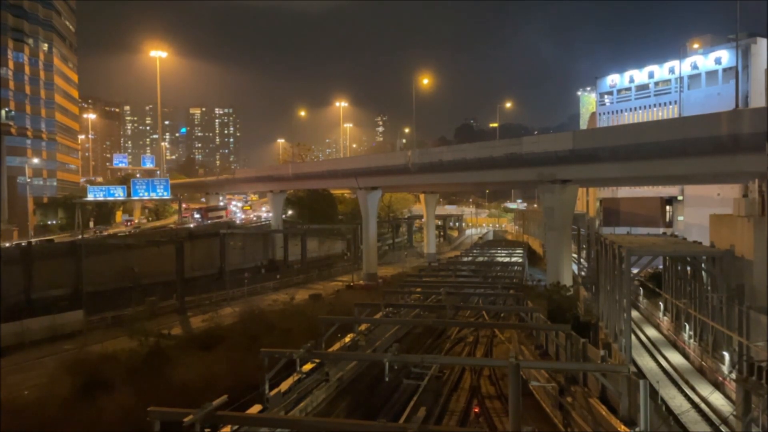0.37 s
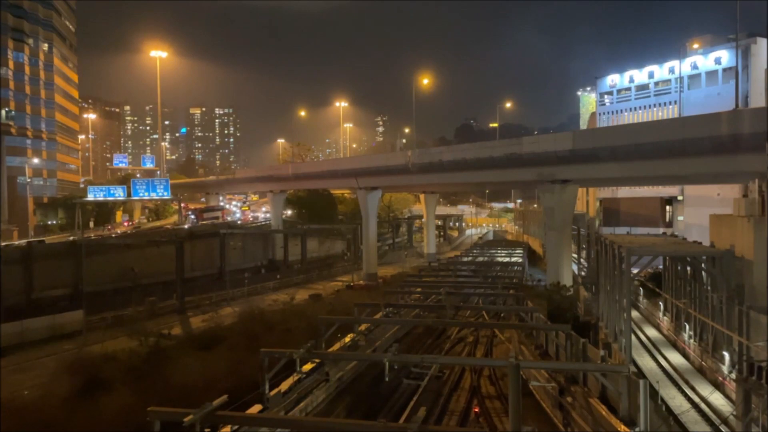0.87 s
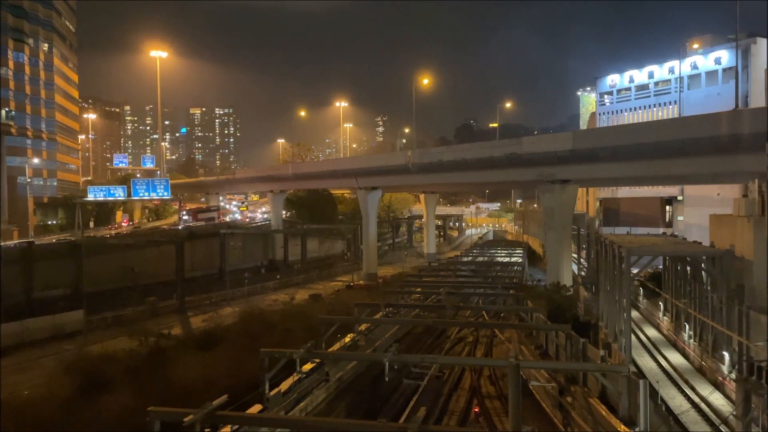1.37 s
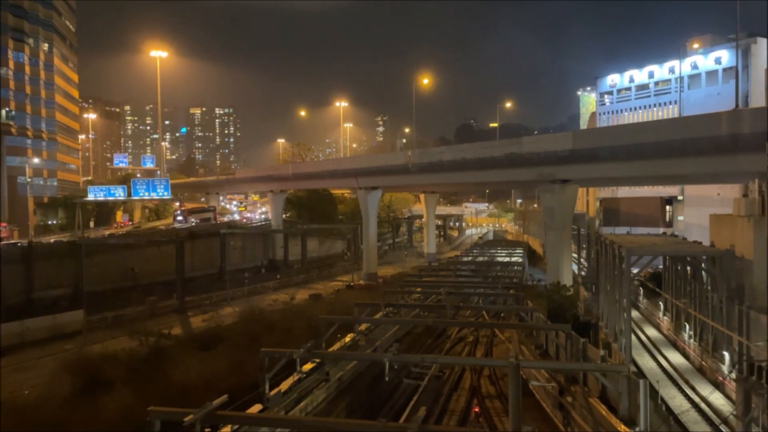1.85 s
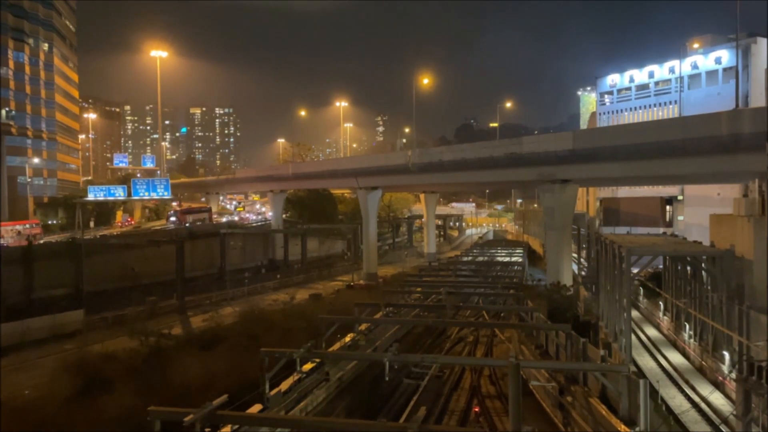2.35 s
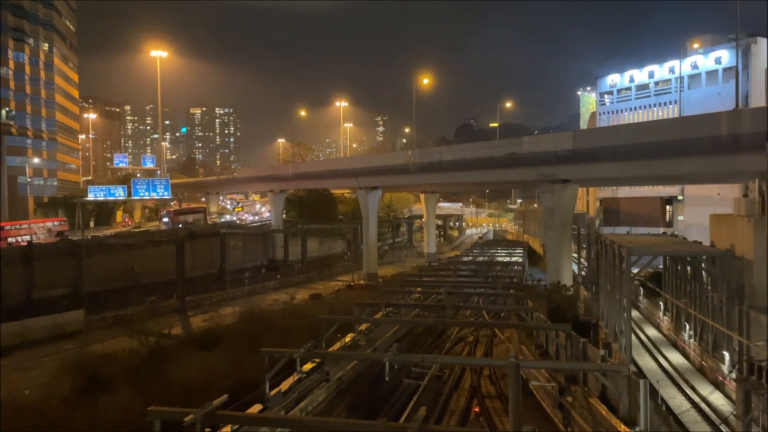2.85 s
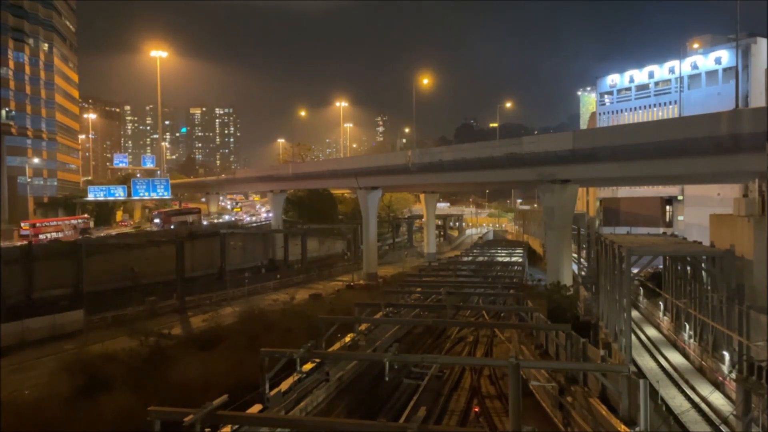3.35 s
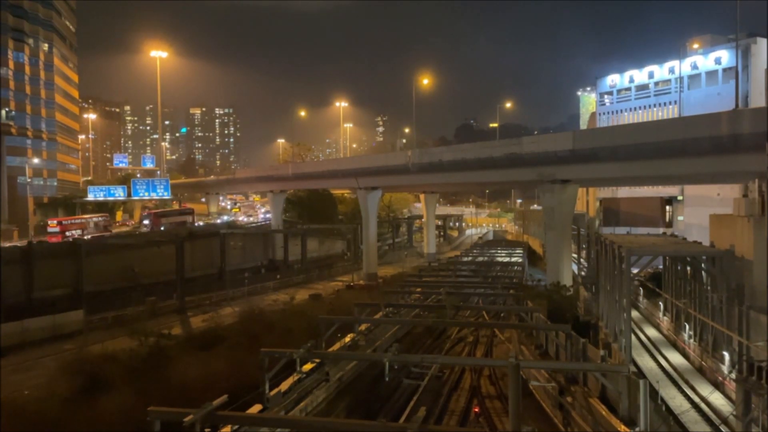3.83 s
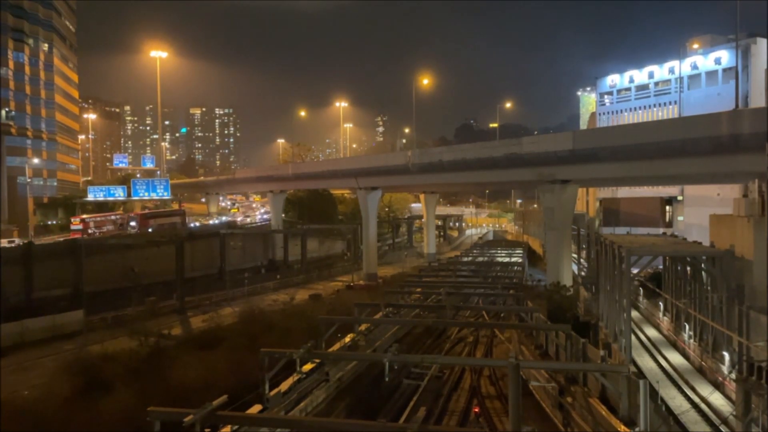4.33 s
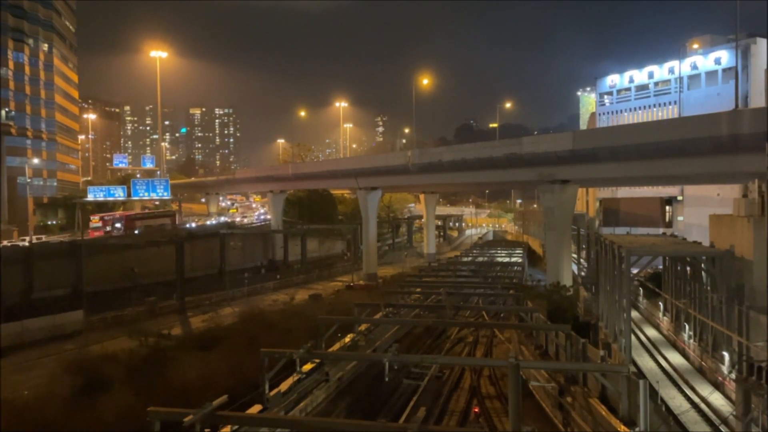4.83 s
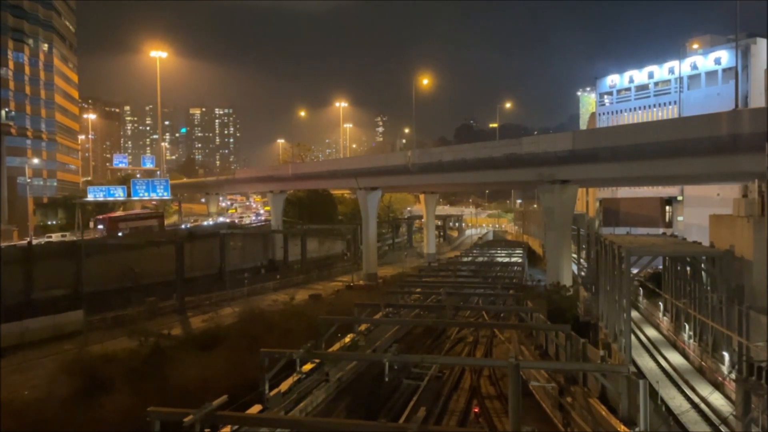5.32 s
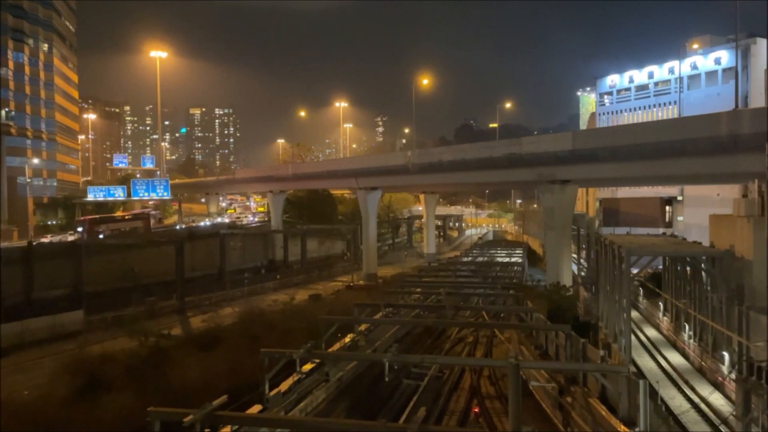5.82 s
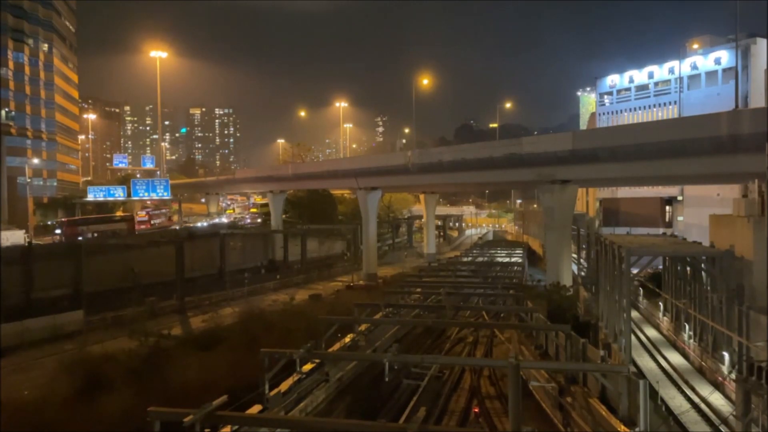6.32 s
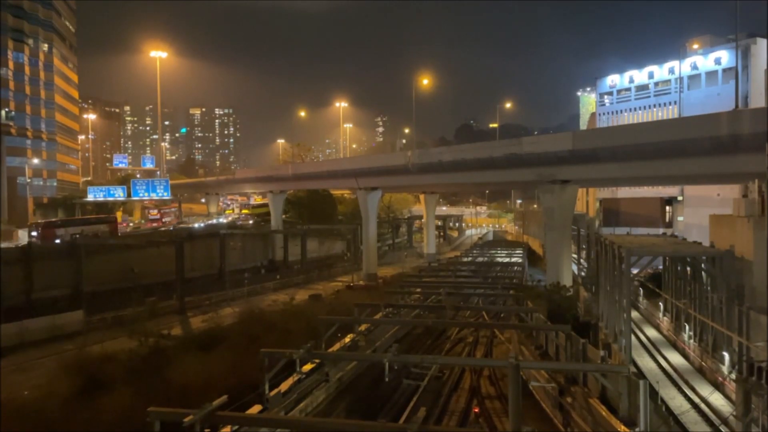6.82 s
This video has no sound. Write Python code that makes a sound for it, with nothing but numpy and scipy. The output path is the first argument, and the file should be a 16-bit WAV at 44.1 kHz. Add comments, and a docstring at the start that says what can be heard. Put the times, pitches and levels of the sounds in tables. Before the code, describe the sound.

Outdoors at night above busy roads, a continuous wash of far traffic in wide stereo. A heavy vehicle's deep engine drone and tyre hiss swell as it moves from right to left, nearest around three seconds, while another car's tyre roar passes the other way. Low gusts buffet the microphones. The drone recedes, two soft knocks tick near five seconds, and a very faint thin brake squeal comes near the end.

```python
"""Night road from above

Traffic in a cutting, heard through two spaced microphones over a far wash of coloured noise.
A heavy vehicle crosses from right to left: a drone of cosine orders, and tyre noise that is briefly shaded.
A second vehicle, tyre noise alone, roars past the other way; both follow the spreading loss of a straight drive.
Low noise gusts buffet the microphones; thin wavering tones make faint brake squeals and a swelling hum;
short ringing modes knock as tyres meet a joint. Near surfaces echo all the noise of the traffic."""
import sys
import numpy as np
from scipy import signal
from scipy.fft import rfft, irfft, next_fast_len
from scipy.io import wavfile
from scipy.ndimage import map_coordinates

SR = 44100
rng = np.random.default_rng(int(sys.argv[2]) if len(sys.argv) > 2 else 0)


def convert_level_to_amplitude(level_db):
    """Map a level in decibels to its linear amplitude factor."""
    exponent = np.asarray(level_db, float) / 20
    return 10 ** exponent


def wrap_up_sound(samples):
    """Save the sound to the file named by the first command line argument, as 16-bit audio."""
    columns = np.atleast_2d(samples).T
    # keep every value between -1 and 1, then stretch to whole-number steps
    tamed = np.clip(columns, -1, 1)
    steps = np.round(tamed * 32767).astype(np.int16)
    wavfile.write(sys.argv[1], SR, steps)


N = 316638
TIME = np.arange(N) / SR
SIZE = next_fast_len(N)
HZ = np.maximum(np.arange(SIZE // 2 + 1) * SR / SIZE, 1)   # 1 Hz floor, for the logarithm


def rms_one(x):
    """Scale to rms 1."""
    return x / np.sqrt(np.mean(x ** 2) + 1e-20)


def in_time(rows):
    """Columns of a curve, sample by sample."""
    times, *columns = np.transpose(rows)
    return [np.interp(TIME, times, column) for column in columns]


def at_hz(points):
    """A curve over log frequency, read at every bin."""
    hz, value = np.transpose(points)
    return np.interp(np.log(HZ), np.log(hz), value)


def filtered(x, gain):
    """Multiply the spectrum by a gain."""
    return irfft(rfft(x, SIZE) * gain, SIZE)[..., :N]


def coloured(spectrum, x):
    """Shape a sound by a spectrum, silent beyond its ends; rms 1."""
    inside = (HZ >= spectrum[0][0]) & (HZ <= spectrum[-1][0])
    return rms_one(filtered(x, convert_level_to_amplitude(at_hz(spectrum)) * inside))


def drift(rate):
    """Slow random wander of rms 1: noise through two equal low-pass poles at rate [Hz]."""
    step = 40   # samples between computed points
    pole = np.exp(-2 * np.pi * rate * step / SR)
    noise = rng.standard_normal(N // step + 2002)
    slow = signal.lfilter([1], [1, -2 * pole, pole * pole], noise)[2000:]   # settled part
    return np.interp(np.arange(N) / step, np.arange(len(slow)), rms_one(slow))


def placed(x, lag, pan_db, order=1):
    """One source reaches two microphones apart in time (left lags, samples) and level (left over right)."""
    way = np.array([[1], [-1]])
    delayed = map_coordinates(x, [np.arange(N) - way * lag / 2], order=order, mode="mirror")
    return delayed * convert_level_to_amplitude(way * pan_db / 2)


# the two straight passes: (nearest at [s], time to drive its own nearest distance [s])
HEAVY_PASS = (3.2, 0.87)
SECOND_PASS = (3.55, 0.99)


def passing(nearest_s, reach_s):
    """A straight drive past: spreading loss in dB and how far ahead it is (1 to -1)."""
    along = (nearest_s - TIME) / reach_s
    return -10 * np.log10(1 + along ** 2), along / np.sqrt(1 + along ** 2)


# the heavy vehicle swings across, also for its tyres and the narrow band: (time [s], left lag [samples])
HEAVY_BEARING = [(0, 14), (.8, 13), (2.75, 3.5), (3.4, -6), (3.95, -11.5), (4.5, -13.5), (7.18, -15)]
DETOUR = 1.42   # low sound bends round the body between the microphones and lags this many times more
# exhaust orders: (time [s], firing rate [Hz], first order level [dB], second order level [dB])
EXHAUST_ORDERS = [(0.0, 49.6, -54, -33), (0.25, 47.64, -47, -23), (0.45, 47.2, -31, -38.5),
                  (0.82, 47.46, -35, -53), (0.96, 47.98, -31, -23), (1.2, 48.24, -48, -23),
                  (1.33, 47.63, -39, -32), (1.46, 48.4, -34, -23), (1.62, 50.16, -24, -22.5),
                  (1.72, 49, -29, -28.5), (1.82, 49.28, -19.5, -23), (2.3, 50.04, -16.5, -20.5),
                  (2.64, 50.1, -14.5, -21.5), (2.9, 51.0, -14.5, -19), (3.2, 50.83, -19, -22),
                  (3.5, 51.3, -19, -20), (3.68, 51.5, -20.5, -28.5), (3.85, 51.3, -19.5, -41),
                  (4.1, 50.9, -24, -33), (4.4, 49.34, -24.5, -60), (4.74, 47.5, -29, -39),
                  (4.95, 47.8, -32, -36), (5.3, 47.25, -26.5, -32.5), (5.55, 48.33, -26.5, -35.5),
                  (5.8, 49, -28.5, -25), (5.92, 47.54, -40, -47), (6.12, 48, -33, -51),
                  (6.27, 48, -35.5, -38), (6.8, 47.5, -34, -32.5), (6.95, 48, -34.5, -35),
                  (7.08, 48.27, -46, -29), (7.18, 49, -49, -35)]
# as it draws level the second order slips ahead of the first: (begins [s], ends [s])
SLIP_SPAN = [2.3, 2.75]


def exhaust():
    """Clean low orders of the firing rate, at first peaking together, wavering more when far."""
    hz, first_db, second_db = in_time(EXHAUST_ORDERS)
    loss_db, _ = passing(*HEAVY_PASS)
    waver_db = 0.4 - 0.2 * loss_db
    turn = 2 * np.pi * np.cumsum(hz * (1 + 0.0053 * drift(8.7))) / SR
    slip = 2 * np.pi * np.interp(TIME, SLIP_SPAN, [0, 0.2])   # up to 0.2 turns
    first = convert_level_to_amplitude(first_db + waver_db * drift(5.5)) * np.cos(turn)
    second = convert_level_to_amplitude(second_db + waver_db * drift(13.0)) * np.cos(2 * turn + slip)
    third = convert_level_to_amplitude(first_db - 24.5 + 3.0 * drift(2.5)) * np.cos(3 * turn)
    lag = DETOUR * in_time(HEAVY_BEARING)[0]
    return placed(np.sqrt(2) * (first + second + third), lag, pan_db=-0.7)


# tyre noise bands, from low roar to finest hiss: (frequency [Hz], relative density [dB])
LOW_ROAR = [(200, -10), (330, 3), (480, 8), (650, 3.5), (780, -4), (950, -44)]
HIGH_ROAR = [(620, -26), (760, 0), (880, -0.5), (980, -4), (1150, -16.5)]
BRIGHT_ROAR = [(850, -13), (1100, -2), (1400, -5.5), (1800, -6), (2100, -10), (2500, -17.5), (3200, -31)]
TREAD_HISS = [(2200, -3), (2900, -2.5), (3700, 1.5), (4300, 2.5), (4700, 0.5), (5200, -18)]
FINE_HISS = [(4000, -21), (5000, -2.5), (5500, -1.5), (6200, -5.5), (6800, -7), (7800, -15.5), (8600, -11),
             (9600, -38)]
TOP_HISS = [(8000, -13), (9200, -4.5), (10000, -18), (11000, -12.5), (11500, -19), (12200, -18),
            (13500, -18)]
# narrow hiss bands, strong on the left and on the right: (frequency [Hz], relative density [dB])
LEFT_HISS = [(7000, -7), (7600, -4), (7950, -2), (8250, -9), (8700, -25)]
RIGHT_HISS = [(9200, -11), (9700, -3.5), (10100, -6), (10450, -11), (10900, -17)]
# the heavy vehicle's swing for the fine hiss, which lags more at first: (time [s], left lag [samples])
FINE_HISS_BEARING = [(0, 18.5), (1.3, 19), (2.0, 18), (2.4, 12.5), (2.85, 12.5), (3.3, -3.5), (3.95, -9),
                     (4.5, -12.5), (7.18, -15.5)]
# something comes between: (begins [s], full [s], full until [s], clear again [s])
SHADE_TIMES = [2.88, 3.12, 3.249, 3.36]
# the fine hiss opens up and drops away: (begins to rise [s], full [s], full until [s], low again [s])
FINE_HISS_TIMES = [0.499, 0.849, 4.802, 5.0]


def tyres():
    """Roar and hiss travel with the two vehicles; part of each comes back scattered from walls."""
    loss_db, ahead = passing(*HEAVY_PASS)
    other_loss_db, other_ahead = passing(*SECOND_PASS)
    lag, = in_time(HEAVY_BEARING)
    fine_lag, = in_time(FINE_HISS_BEARING)
    other_lag = -14.5 * other_ahead   # samples, before the detour
    other_side_db = 2 * other_ahead   # towards the microphone it is nearer to
    shade = np.interp(TIME, SHADE_TIMES, [0, 1, 1, 0])
    fine_drop_db = -6.5 * np.interp(TIME, FINE_HISS_TIMES, [1, 0, 0, 1])
    lean = 7.4 + 3.4 * ahead   # hiss leans left, most while the heavy vehicle approaches
    # a long vehicle close by fills a wide angle: more of its fine hiss is unlike at the two microphones
    wide_db = 11.5 * (1 - ahead ** 2) ** 2
    # (spectrum, heavy level [dB], more while it approaches [dB], second vehicle level [dB],
    #  share of spreading loss, shading [dB], lag factor, fine hiss [0 or 1], left over right [dB],
    #  scattered over direct [dB])
    bands = (
        (LOW_ROAR, -35.5, 0.8, -38, 0.4, -2.5, DETOUR, 0, 0.3, -5),
        (HIGH_ROAR, -42, 0.8, -36, 0.5, -3.5, DETOUR, 0, 2.5, -8),
        (BRIGHT_ROAR, -37.5, 1.5, -42.5, 1.1, -4.5, 1.3, 0, 0.3, -8),
        (TREAD_HISS, -49, 0.6, -54, 1.1, -7, 1, 0, 0.54 * lean, -4),
        (FINE_HISS, -53, 3.0, -66, 0.9, -8, 1, 1, 0.72 * lean, -7.0),
        (TOP_HISS, -62.5, 4.0, -75, 1.3, -7, 1, 1, 0.36 * lean, -1.5),
        (LEFT_HISS, -62, 5.0, -85, 1.2, -8, 1, 1, 12.0, -22),
        (RIGHT_HISS, -66.5, -2.5, -85, 0.7, -8, 1, 1, -14.0, -22))
    out = 0
    for (spectrum, db, ahead_db, other_db, fade, shaded_db,
         factor, fine, side_db, scattered_db) in bands:
        first, second, *scattered = coloured(spectrum, rng.standard_normal((4, N)))
        gain = convert_level_to_amplitude(db + ahead_db * ahead + fade * loss_db + fine * fine_drop_db)
        other_gain = convert_level_to_amplitude(other_db + fade * other_loss_db)
        order = 3 if spectrum[-1][0] > 4000 else 1   # smoother interpolation for the treble
        heavy_lag = fine_lag if fine else factor * lag
        direct = gain * placed(first, heavy_lag, side_db, order=order)
        direct += other_gain * placed(second, factor * other_lag, other_side_db, order=order)
        scatter = convert_level_to_amplitude(scattered_db + fine * wide_db)
        walls = np.hypot(gain, other_gain) * scatter * np.array(scattered)
        flicker_db = (0.8 + 0.7 * fine) * drift(10)
        out = out + (direct + walls) / np.hypot(1, scatter) * convert_level_to_amplitude(shaded_db * shade + flicker_db)
    return out


# a narrow noise band near 4 kHz swells twice, weakly around 2.8 s and strongly around 4.2 s:
# (time [s], centre [Hz], level [dB])
NARROW_BAND = [(2.2, 4263, -85), (2.55, 4200, -68), (2.85, 4153, -64), (3.1, 4286, -85), (3.25, 4380, -72),
               (3.42, 4432, -68), (3.6, 4330, -73), (3.85, 4157, -55), (4.25, 3890, -52.5),
               (4.7, 3822, -57), (5.2, 3731, -85)]


def narrow_band():
    """Low-passed noise carried up to a drifting centre; it leans left at first, then right."""
    hz, db = in_time(NARROW_BAND)
    width_hz = 600
    low_pass = signal.butter(2, width_hz / 2, fs=SR, output="sos")
    slow = signal.sosfilt(low_pass, rng.standard_normal((2, N)))
    turn = 2 * np.pi * np.cumsum(hz) / SR
    band = rms_one(slow[0] * np.cos(turn) + slow[1] * np.sin(turn))
    _, ahead = passing(*HEAVY_PASS)
    return placed(convert_level_to_amplitude(db) * band, in_time(HEAVY_BEARING)[0], 3 * ahead, order=3)


def wavering(hz, db, shake_db, shake_hz, rate):
    """A thin tone, unsteady in level and pitch."""
    level = np.sqrt(2) * convert_level_to_amplitude(db + shake_db * drift(rate))
    return level * np.sin(2 * np.pi * np.cumsum(hz + shake_hz * drift(rate)) / SR)


def swells(rows, **unsteady):
    """Each tone fades in, grows louder early in its length, then sinks and fades out."""
    out = 0
    for start, length, hz, db in rows:
        sounding = np.clip(np.minimum(TIME - start, start + length - TIME) / 0.02, 0, 1)
        shape_db = np.interp((TIME - start) / length, [0, 0.25, 1], [-5, 0, -9])
        out = out + sounding * wavering(hz, db + shape_db, **unsteady)
    return out


# hum swells: (start [s], length [s], pitch [Hz], level at the top of the swell [dB])
HUM_SWELLS = [(1.2, 0.93, 203.7, -36.5), (2.3, 0.43, 219, -54), (3.25, 1, 217.7, -35.5),
              (4.6, .35, 206.3, -38.5)]


def hums():
    """A low tone swells and sinks, equal at both microphones."""
    return swells(HUM_SWELLS, shake_db=0.5, shake_hz=1.57, rate=3.66)


# brake squeals: (start [s], length [s], pitch [Hz], level at the top of the swell [dB])
BRAKE_SQUEALS = [(3.15, 1.1, 7070, -73), (6.535, .08, 6835, -65), (6.61, .16, 6845, -59),
                 (6.76, .38, 6840, -67)]


def squeals():
    """Brakes squeal as thin, unsteady high tones far to one side."""
    tones = swells(BRAKE_SQUEALS, shake_db=2.2, shake_hz=12, rate=25)
    return placed(tones, lag=-11.5, pan_db=-1.5, order=3)


# tyres over a joint: (time [s], level [dB])
JOINT_BLOWS = [(4.88, -18), (5.178, -21.5)]
# modes of one blow: (pitch [Hz], level relative to the blow [dB], time to fall 60 dB [s])
BLOW_MODES = [(827, 0, 0.038), (1130, 15.5, 0.011), (1400, -9, 0.019)]


def knocks():
    """Each soft blow sets a few short modes ringing."""
    out = 0
    for start, db in JOINT_BLOWS:
        age = np.clip(TIME - start, 0, 1)
        soft_onset = 1 - np.exp(-age / 0.0015)
        for hz, level_db, t60 in BLOW_MODES:
            decay = convert_level_to_amplitude(db + level_db - 60 * age / t60)
            out = out + soft_onset * decay * np.sin(2 * np.pi * hz * age)
    return placed(out, lag=17.0, pan_db=-1.0)


# likeness of far traffic at the two microphones: (frequency [Hz], left-right correlation)
FAR_LIKENESS = [(40, 1), (98, 0.81), (160, 0.9), (260, 0.67), (420, -0.61), (690, -0.33), (1130, -0.69),
                (1840, -0.63), (3000, 0.27), (4890, 0.17), (7970, .15), (13000, 0.48)]


def spread(spectrum, flicker_db):
    """Noise from many far vehicles on both sides: alike in the bass, opposed near 1 kHz; it flickers."""
    alike = np.clip(at_hz(FAR_LIKENESS), -1, 1)
    mid, side = rng.standard_normal((2, N))
    pair = filtered(mid, np.sqrt(1 + alike)) + filtered(side, np.sqrt(1 - alike)) * [[1], [-1]]
    return coloured(spectrum, pair) * convert_level_to_amplitude(flicker_db * drift(6.7))


# far tyres and engines: (frequency [Hz], relative density [dB])
FAR_WASH = [(150, 0.5), (250, -1), (400, -4), (700, -3), (950, -2.5), (1200, -7.5), (1700, -14),
            (2450, -17.5), (2800, -22), (3150, -23), (3650, -25.5), (4050, -32), (4450, -35.5), (4800, -30),
            (5400, -34.5), (7000, -36.5), (10000, -53), (12000, -52), (13500, -67)]
FAR_RUMBLE = [(28, -19), (40, -29), (60, -4.5), (85, -7.5), (105, -8.5), (130, -28)]
FAR_GROWL = [(85, -25.5), (120, -0.5), (170, -0.5), (220, -5.5), (280, -5), (400, -15)]


def far_traffic():
    """A steady wash; engine rumble swells with the second vehicle and growl with the heavy one."""
    heavy_loss_db, _ = passing(*HEAVY_PASS)
    second_loss_db, _ = passing(*SECOND_PASS)
    wash = convert_level_to_amplitude(-33.5) * spread(FAR_WASH, flicker_db=0.8)
    rumble = convert_level_to_amplitude(-27 + 0.38 * second_loss_db) * spread(FAR_RUMBLE, flicker_db=1.5)
    growl = convert_level_to_amplitude(-32.5 + 0.11 * heavy_loss_db) * spread(FAR_GROWL, flicker_db=2.5)
    return wash + rumble + growl


# echoes off road, piers and walls: (mean delay [s], level [dB])
NEAR_ECHOES = [(.0031, -10), (.0057, -11), (.0103, -13), (.023, -14)]
# small surfaces return mostly treble: (frequency [Hz], gain [dB])
ECHO_TINT = [(150, -10), (1000, -3), (6000, 2)]


def echoed(x):
    """Near surfaces return copies with creeping delays: narrow peaks and gaps wander through the noise."""
    colour = convert_level_to_amplitude(at_hz(ECHO_TINT))
    thin = filtered(x, colour)
    out = x.copy()
    for delay_s, db in NEAR_ECHOES:
        creep = 1 + 0.09 * drift(1.2)
        at = np.arange(N) - delay_s * SR * creep
        copies = [map_coordinates(ear, [at], order=3, mode="mirror") for ear in thin]
        out += convert_level_to_amplitude(db) * np.array(copies)
    echo_power = sum(convert_level_to_amplitude(db) ** 2 for _, db in NEAR_ECHOES)
    return filtered(out, 1 / np.sqrt(1 + colour ** 2 * echo_power))   # take back the added power


# gusts on the microphones: (peak at [s], level [dB], time from peak to 1/e [s])
WIND_GUSTS = [(0.24, -22, 0.25), (0.647, -23, 0.16), (0.893, -25.5, 0.082), (1.227, -26, 0.5),
              (2.041, -32, 0.27), (3.714, -23, 0.2), (4.104, -29, 0.13), (4.62, -44, 0.2),
              (4.956, -35, 0.061), (5.718, -42, .1), (6.87, -31, 0.062), (7.06, -33, .05)]
# wind noise: (frequency [Hz], relative density [dB])
WIND_SPECTRUM = [(25, -26), (45, -6.5), (70, -3.5), (100, -5.5), (140, -9.5), (200, -13.5), (280, -23),
                 (450, -30)]


def wind():
    """Lumpy low noise, its own at each microphone; each gust swells and dies along a bell curve."""
    force = convert_level_to_amplitude(-42)   # steady breeze
    for peak_s, db, length in WIND_GUSTS:
        force = force + convert_level_to_amplitude(db) * np.exp(-((TIME - peak_s) / length) ** 2)
    lumps_db = 2 * np.array([drift(8), drift(8)])
    return force * convert_level_to_amplitude(lumps_db) * coloured(WIND_SPECTRUM, rng.standard_normal((2, N)))


def scene():
    """The crossing vehicles, the small events, far traffic and wind."""
    traffic_noise = echoed(tyres() + narrow_band() + far_traffic())
    return exhaust() + traffic_noise + hums() + squeals() + knocks() + wind()


def top_cut(x):
    """Nothing passes above the cut-off."""
    return signal.sosfilt(signal.butter(12, 13590, fs=SR, output="sos"), x)


# microphone housings, left then right: (centre [Hz], distance from centre to 1/e [Hz], lift [dB])
HOUSING_BANDS = [
    [(3450, 660, 1.5), (7550, 6700, 0), (9500, 230, -20)],
    [(4200, 960, 1), (10300, 7000, -1), (8400, 620, 0.5)],
]


def record(dry):
    """Each microphone housing lifts or cuts its own treble bands."""
    lift_db = [sum(db * np.exp(-((HZ - hz) / width) ** 2) for hz, width, db in bands)
               for bands in HOUSING_BANDS]
    mix = filtered(dry, convert_level_to_amplitude(np.array(lift_db)))
    return top_cut(mix)


dry = scene()
out = record(dry)
wrap_up_sound(out)
```